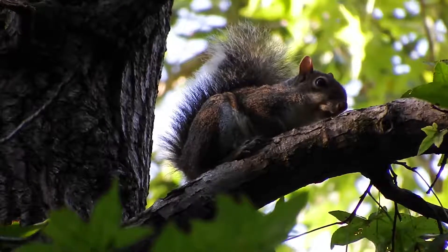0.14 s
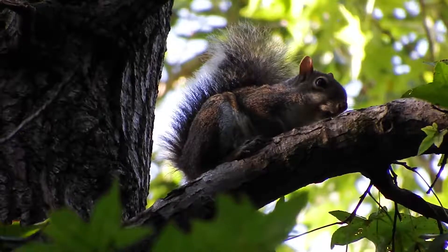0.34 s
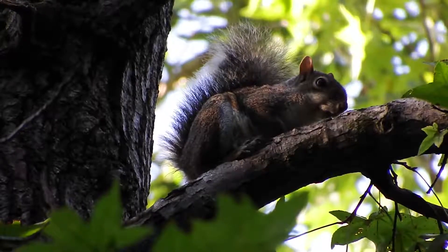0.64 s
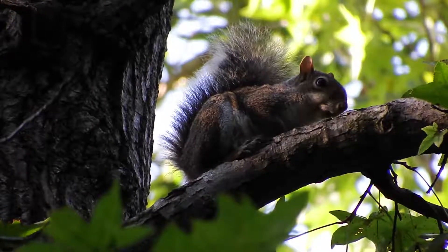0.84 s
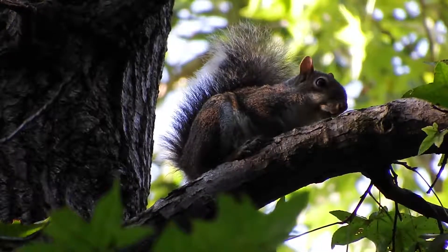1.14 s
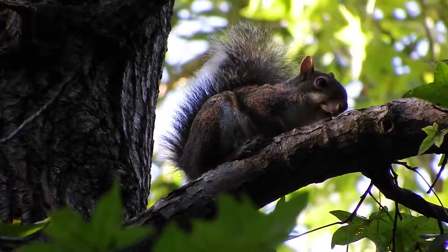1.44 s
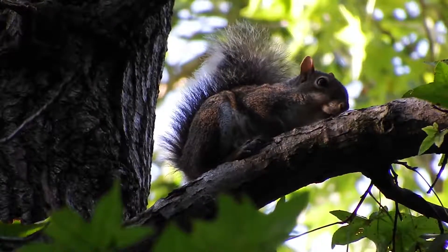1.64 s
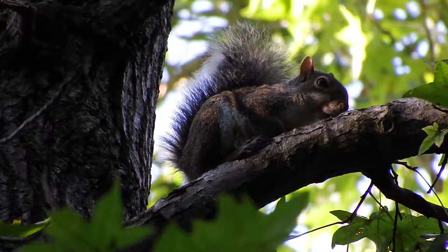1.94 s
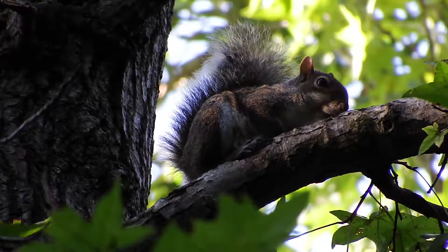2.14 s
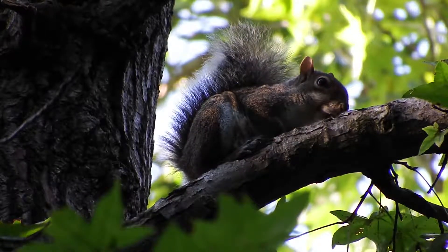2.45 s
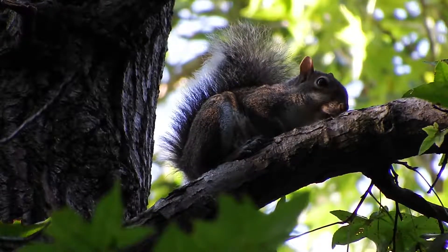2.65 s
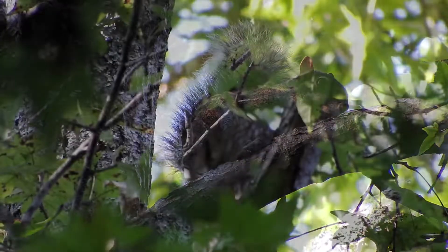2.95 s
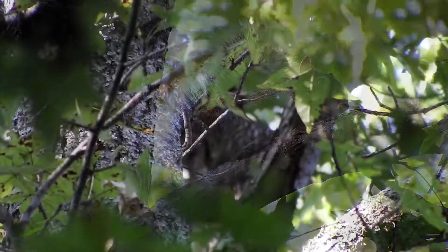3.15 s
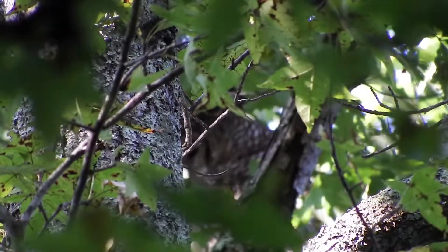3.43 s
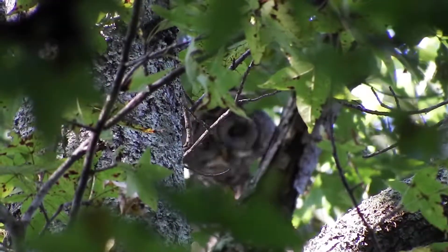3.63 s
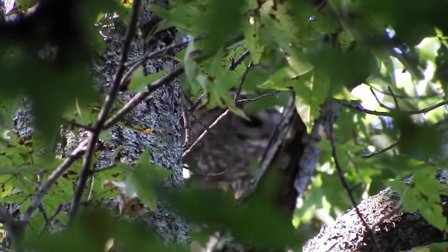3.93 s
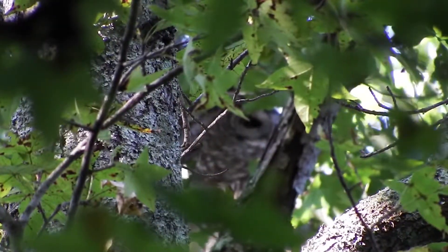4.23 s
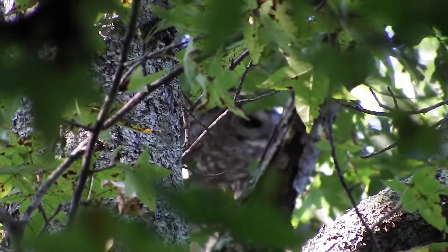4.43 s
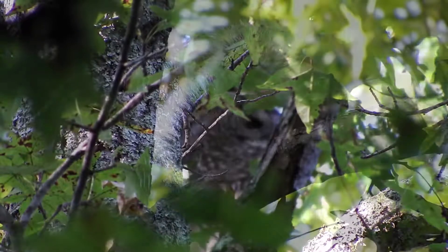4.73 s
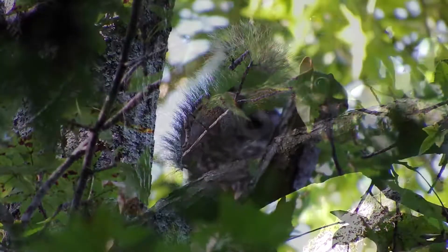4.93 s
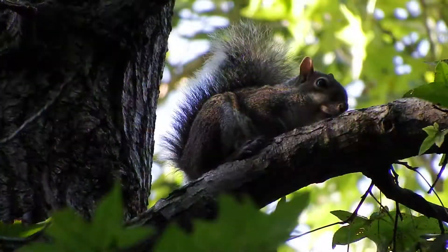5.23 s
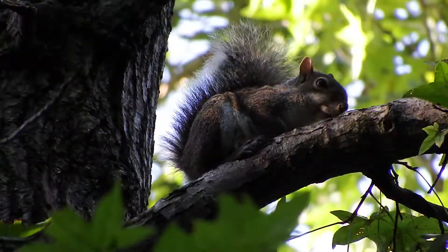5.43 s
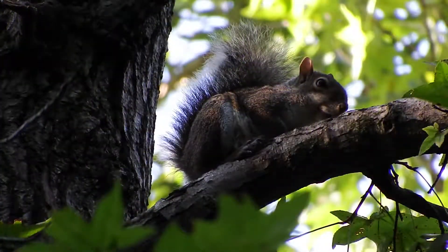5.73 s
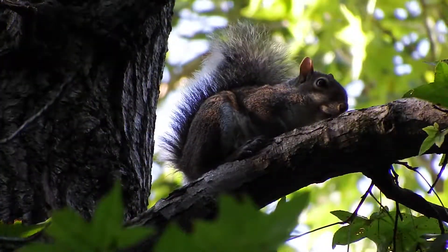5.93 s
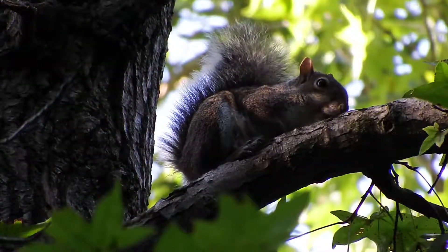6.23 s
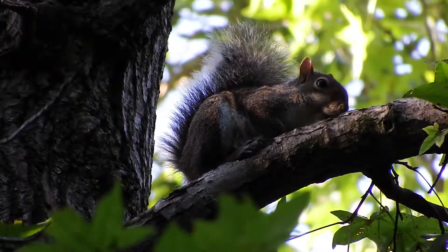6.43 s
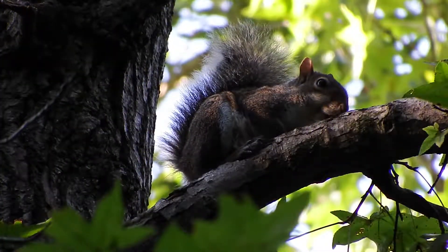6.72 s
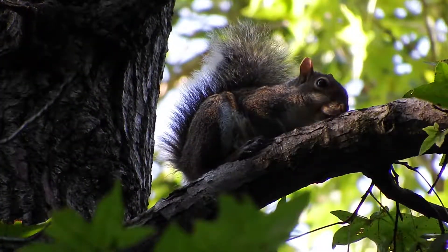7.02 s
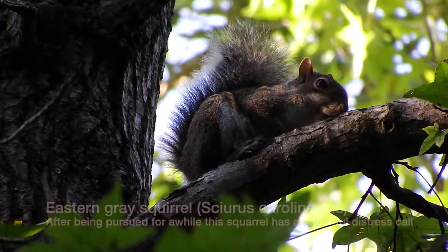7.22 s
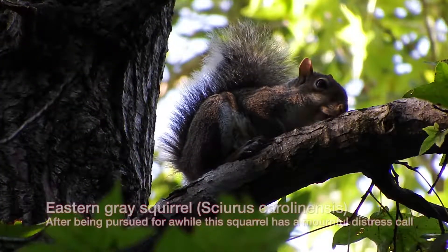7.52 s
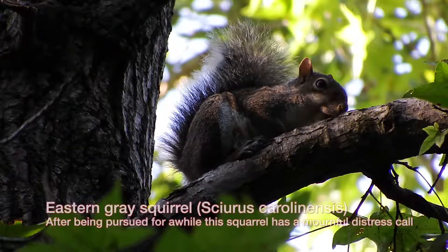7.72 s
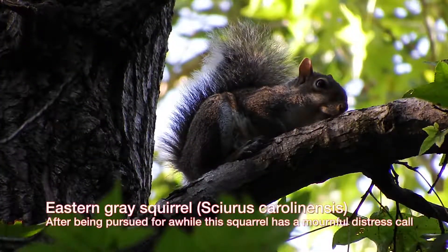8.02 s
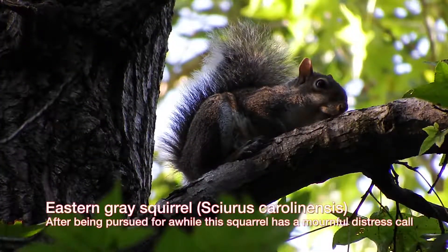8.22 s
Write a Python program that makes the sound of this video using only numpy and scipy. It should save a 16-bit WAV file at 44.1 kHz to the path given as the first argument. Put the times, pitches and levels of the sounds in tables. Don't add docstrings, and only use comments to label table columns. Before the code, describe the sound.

A squirrel on a branch gives two long hoarse rasping cries with a soft clear moan between, as wrens whistle in echoing woodland under steady hiss.

```python
import sys
import numpy as np
from scipy import signal
from scipy.io import wavfile
from scipy.ndimage import uniform_filter1d

SR = 44100
rng = np.random.default_rng(int(sys.argv[2]) if len(sys.argv) > 2 else 0)


def store_pcm(level_fs):
    pcm = np.round(np.clip(level_fs, -1, 1) * 32767).astype(np.int16)
    wavfile.write(sys.argv[1], SR, np.atleast_2d(pcm).T)


def amplitude_ratio(level_db):
    exponent = np.asarray(level_db, float) / 20
    return 10 ** exponent


N = 369024

# pitch_hz, level_db
ROAR_COLOUR = [(40, -52), (90, -19.5), (200, -11), (270, -3.5), (450, -2), (780, 2.5), (1000, -4.5),
               (1400, -4.5), (2000, -10.5), (2500, -11), (3500, -10.5), (4350, -9), (4900, -12),
               (6000, -19.5)]
# time_s, level_db
ROAR_LEVEL = [(0.0, -46.5), (0.3, -49.5), (0.67, -48.5), (1.32, -49.5), (1.56, -50.5), (2.16, -51),
              (2.49, -51.5), (5.01, -50.5), (5.54, -51), (6.45, -50), (7.22, -50.5), (8.36, -49.5)]
# pitch_hz, likeness (0-1)
ROAR_LIKENESS = [(60, 1), (250, 0.88), (1000, 0.95), (2500, 0.92), (5000, 1)]
# pitch_hz, level_db
HISS_COLOUR = [(3240, -30), (5500, 0), (6410, -2.5), (7850, -1), (14600, -6), (15700, -9)]
# centre_hz, width_hz
MIC_NOTCHES = [(215, 52), (1100, 145)]
# centre_hz, width_hz, level_db
CAMERA_BODY = [(361, 75, -14.5), (823, 170, 1), (1080, 130, 1.5), (1390, 230, -2.5), (2217, 77, -9.5),
               (3400, 140, -9.5), (4266, 150, -8.5)]
# time_s, level_db, strong_weak_step_db
LENS_LEVEL = [(0, -44, -0.5), (.4, -45.5, 5), (.8, -44.5, 5.5), (1.05, -49.5, 8), (1.3, -44.5, 3),
              (1.49, -49.5, 8)]
# time_s, level_db
LENS_CLICK = (1.521, -28.5)
# pitch_hz, decay_t60_s
WOOD_DECAY = [(1000, 0.4), (2500, 1), (4000, 0.89), (6000, 0.59)]

# centre_s, length_s, start_hz, end_hz, peak_db
FAR_PHRASE = [
    (-.08, .03, 2963, 3180, -3.5),
    (-.045, 0.022, 2883, 3300, 5.5),
    (-.012, .03, 3100, 3746, 5),
    (.06, 0.12, 3774, 3718, 0),
    (.145, .05, 2150, 2447, -2),
    (.31, 0.2, 2461, 2481, -9),
    (0.198, .16, 3760, 3718, -8),
]
# start_s, level_db, held_note_hz, low_answer_db, lead_in_db
FAR_ROUNDS = [
    (1.3, -40.5, 3825, 1, -4),
    (1.69, -37, 3775, -9, -3.5),
    (2.095, -38, 3716, -5.5, -2),
    (2.5, -39, 3670, -10, -14),
    (7.335, -34, 3795, -9, -16),
    (7.7, -39, 3750, -3, -2),
    (8.105, -38.5, 3680, -27, -4),
]
# centre_s, length_s, start_hz, end_hz, peak_db
STRAY_NOTES = [
    (0.028, .04, 2900, 3560, -43),
    (0.074, .04, 3300, 4100, -45),
    (0.395, .015, 3520, 2780, -46),
    (.45, .05, 3797, 3740, -44.5),
    (0.769, .02, 3300, 2790, -42),
    (0.824, .05, 3710, 3793, -47),
    (1.129, .02, 3300, 2780, -41.5),
    (1.19, .05, 3750, 3800, -44.5),
    (2.86, .15, 3350, 3270, -37),
    (3.0, .16, 3250, 3060, -50),
]
# centre_s, length_s, start_hz, end_hz, peak_db
NEAR_PHRASE = [(-.008, 0.0047, 5040, 4660, -10), (0, .009, 3810, 3497, 1), (.001, 0.013, 4650, 2650, -15),
               (.006, .007, 3140, 2610, -7.5), (0.052, .033, 2300, 2247, -16.5),
               (0.074, .011, 3044, 2590, -12), (.081, 0.013, 2725, 3070, -2.5),
               (0.089, .014, 3035, 3750, -10.5), (.097, .017, 3620, 4180, -7),
               (0.117, 0.013, 4374, 4840, -4.5), (.172, .03, 2280, 2690, -13), (.193, .016, 2696, 2920, -3),
               (0.259, .087, 2325, 1795, -16)]
# start_s, level_db, tempo_stretch, fall_depth under the resting note, upper_lift (0-1)
NEAR_ROUNDS = [
    (4.471, -23, .98, 0.71, .001),
    (4.879, -23.5, .98, .9, 0.001),
    (5.275, -22, .995, 1.0, 0.01),
    (5.671, -22, 1.01, 0.83, .05),
]
# pitch_hz, level_db, decay_t60_s
BEAK_MODES = [(3300, -12, 0.012), (4700, -20, 0.014), (6160, -2, 0.006), (8200, -9, .005)]

# time_s, effort_db, first_resonance_hz, mouth_opening (0-1)
CRIES = [
    [(1.8, -27, 2210, 0.4), (1.84, -42, 2130, 0.96), (1.915, -35.5, 2140, 0.74), (2.02, -39, 2060, 0.64),
     (2.15, -42, 2120, 0), (2.41, -42.5, 2020, 0.34), (2.6, -43.5, 2100, 0.43), (2.76, -43, 2073, 0.89),
     (2.88, -55, 2084, 0.76)],
    [(6.2, -35, 2080, .5), (6.24, -39, 2080, 0.3), (6.28, -36, 2070, 0.73), (6.4, -38.5, 2080, 0.52),
     (6.52, -40, 2130, 0.02), (6.78, -42, 1950, 0.23), (7.1, -45.5, 2080, 0.78), (7.3, -44, 2066, 0.95),
     (7.365, -55, 2040, 0.64)],
]
# centre_hz, width_hz, level_db, fade_s
CRY_BREATH = [(1815, 70, -4, .17), (5050, 600, 1.5, .12), (9100, 900, 2.5, .15)]
# shut_hz, open_hz, shut_db, open_db
UPPER_THROAT = [(2804, 2680, -8, -1.5), (3223, 3400, 2, -4.5), (3730, 3950, -7.5, 9.5)]
# pitch_hz, level_db
CLEAR_THROAT = [(500, -29), (1000, -24), (1550, -18), (2050, -3), (2600, -9.5), (3100, -7), (3600, -4.5),
                (4100, -4.5), (4700, 3.5), (5300, 20)]
# start_s, pitch_hz, level_db, sag_hz
OPENERS = [
    (1.8, 1125, -34, 43.6),
    (6.197, 1050, -33.5, 4.6),
]
# start_s, settle_s, level_db
VOICE_SLIDES = [
    (2.02, .105, -41),
    (6.385, .135, -43),
]
# time_s, pitch_hz, level_db, half_line_share (0-1), brightness_db per octave
MOAN = [
    [(4.755, 1044, -73, .01, -10), (4.83, 1008, -40.5, 0.1, -7.5), (4.875, 996, -38.5, 0.5, -4),
     (4.89, 1015, -39.5, .95, -6), (4.96, 1006, -41.5, 1, -3.5), (5.0, 976, -48, .1, -14),
     (5.09, 944, -34, 0.3, -4)],
    [(5.17, 990, -52, .01, 1), (5.27, 1025, -44, 0.1, 4)],
]

BEAK_SNAP_S = 4.4782


def evened(x):
    return x / np.sqrt(np.mean(x ** 2) + 1e-20)


def read(points, hz):
    f, value = np.transpose(points)
    return np.interp(np.log(hz + 1), np.log(f + 1), value)


def add(mix, s, sound):
    part = mix[round(s * SR):][:len(sound)]
    part += sound[:len(part)]


def unroll(rows):
    s, *columns = np.transpose(rows)
    t = np.arange(s[0], s[-1], 1 / SR)
    return t, [np.interp(t, s, c) for c in columns]


def wander(count, smooth):
    noise = rng.standard_normal(3 * SR // 2 + 2000)
    return evened(uniform_filter1d(noise, round(smooth)))[:count]


def flutter(smooth):
    return evened(uniform_filter1d(rng.standard_normal(N), size=smooth))


def resonate(x, hz, width):
    turn = np.exp(2j * np.pi * np.cumsum(hz * np.ones(len(x))) / SR)
    r = np.exp(-np.pi * width / SR)
    smooth = signal.lfilter([(1 - r) ** 2], [1, -2 * r, r * r], x / turn)
    return 2 * (turn * smooth).real


def snap(hz, db, t60):
    t = np.arange(SR // 20) / SR
    return amplitude_ratio(db - 60 * t / t60) * np.sin(2 * np.pi * hz * t) * np.minimum(t / 0.00035, 1)


def air(spectrum, same, patchy_db):
    frames, hz = N // 1024 + 5, np.fft.rfftfreq(2048, 1 / SR)
    a, b, c, d, patches = rng.standard_normal((frames, len(hz), 5)).T
    patches = uniform_filter1d(patches, size=20, axis=0)
    patches = evened(uniform_filter1d(patches, size=4, axis=1))
    same = np.clip(read(same, hz), -1, 1)[:, None]
    left = a + 1j * b
    right = same * left + np.sqrt(1 - same ** 2) * (c + 1j * d)
    z = np.array([left, right]) * amplitude_ratio(read(spectrum, hz)[:, None] + patchy_db * patches)
    return evened(signal.istft(z, window="cosine", nperseg=2048, noverlap=1024)[1][:, :N])


def distant_roar():
    level_db = np.interp(np.arange(N) / SR, *np.transpose(ROAR_LEVEL))
    return air(ROAR_COLOUR, ROAR_LIKENESS, 0.78) * amplitude_ratio([[3.8], [3.2]] + level_db)


def preamp_hiss():
    colour = [(100, -29), (4000, -4)] + HISS_COLOUR[1:]
    return amplitude_ratio(-69 + 6.0) * air(colour, [(100, .15), (16000, 0.16)], 0.33)


def lens():
    steps_per_s, first_s = 59.94, .0018
    t, (db, step_db) = unroll(LENS_LEVEL)
    count = np.floor((t - first_s) * steps_per_s)
    since = (t - first_s) - count / steps_per_s
    uneven_db = 2.9 * rng.standard_normal(size=100)[count.astype(int) + 1]
    size_db = step_db * (-1) ** (count + 1) + uneven_db
    knocks = amplitude_ratio(size_db) * (np.exp(-since / 0.0044) + 0.15) * wander(len(t), 1)
    body = sum(amplitude_ratio(g) * evened(resonate(knocks, hz, w)) for hz, w, g in CAMERA_BODY)
    click = snap(740, -4, 0.038) + snap(1450, -1.3, 0.028) + snap(1860, -4.5, .02)
    click += snap(3140, -3, 0.014) + snap(4300, 0.45, .02)
    out = np.zeros(N)
    add(out, 0, amplitude_ratio(db) * evened(body))
    add(out, LENS_CLICK[0], amplitude_ratio(LENS_CLICK[1]) * click)
    return out


def wood(x, first_s):
    taps = rng.standard_normal((2, SR)) * (rng.random((2, SR)) < .03)
    taps = taps * (np.arange(SR) > first_s * SR)
    hz, t, z = signal.stft(taps, SR)
    tail = signal.istft(z * amplitude_ratio(-60 * t / read(WOOD_DECAY, hz)[:, None]), SR)[1]
    tail = tail[0] + .1 * np.array([tail[1], -tail[1]])
    return signal.fftconvolve(x[None], tail / np.linalg.norm(tail[0]), axes=1)[:, :N]


def whistle(centre, length, start_hz, end_hz, db):
    u = np.linspace(0, 1, round(length * 1.3 * SR))
    hz = start_hz + (end_hz - start_hz) * (1.3 * u - .15)
    tone = np.sin(2 * np.pi * np.cumsum(hz) / SR)
    return centre - length * .65, amplitude_ratio(db) * tone * signal.windows.tukey(len(u), .8)


def far_birds():
    far = np.zeros(N)
    for s, db, held_hz, low_db, lead_db in FAR_ROUNDS:
        shift = held_hz / 3774
        for centre, length, start_hz, end_hz, note_db in FAR_PHRASE:
            level_db = db + note_db + low_db * (end_hz < 2600) + lead_db * (centre < 0)
            add(far, *whistle(s + centre, length, shift * start_hz, shift * end_hz, level_db))
    for note in STRAY_NOTES:
        add(far, *whistle(*note))
    return far * (0.5 + 0.41 * flutter(400))


def near_notes():
    rest_hz, upper_hz, upper_width_hz = 2300, 3750, 710
    for s, db, tempo, depth, lift in NEAR_ROUNDS:
        for centre, length, start_hz, end_hz, note_db in NEAR_PHRASE:
            at, hz = s + tempo * centre, np.array([start_hz, end_hz])
            raised = 1 + lift * np.exp(-((hz - upper_hz) / upper_width_hz) ** 2)
            hz = hz * np.minimum(hz / rest_hz, 1) ** (depth - 1) * raised
            warm_db = -12.5 * hz.mean() / rest_hz * np.exp(-(at - NEAR_ROUNDS[0][0]) / 0.2)
            if at > BEAK_SNAP_S + .02:
                yield at, tempo * length, *hz, db + note_db + warm_db


def near_wren():
    near = np.zeros(N)
    for note in near_notes():
        add(near, *whistle(*note))
    add(near, .079, amplitude_ratio(-9.5) * near.copy())
    return near


def beak_snap():
    beak = np.zeros(N)
    add(beak, BEAK_SNAP_S, sum(snap(*mode) for mode in BEAK_MODES))
    return signal.lfilter(*signal.butter(2, 2900, "high", fs=SR), beak)


def throat(rows):
    t, (db, hz, mouth) = unroll(rows)
    mouth = np.clip(mouth, 0, 1)
    to_yelp = rows[-2][0] - t
    catch_db = -10 * np.exp(-(to_yelp / .09) ** 2) * (to_yelp > 0) + 6 * (to_yelp <= 0)
    lag_db = -19 * np.exp(-((t - t[0]) / 0.059) ** 2) - catch_db
    columns = [db + catch_db, hz + 170 * (to_yelp <= 0)]
    for shut_hz, open_hz, shut_db, open_db in UPPER_THROAT:
        columns.append(shut_db + (open_db - shut_db) * mouth + lag_db)
        columns.append(shut_hz + (open_hz - shut_hz) * mouth)
    columns[2] = columns[2] + 9.5 * ((t - t[0]) / (t[-1] - t[0]) - .5)
    return t, columns


def cry(rows):
    t, (db, hz1, db2, hz2, db3, hz3, db4, hz4) = throat(rows)
    n = len(t)
    pitch = hz1 / 4 * (1 + .12 * wander(n, 300))
    slaps = np.diff(np.floor(np.cumsum(pitch) / SR), prepend=0) * (1 + 0.51 * wander(n, 1))
    lurch = amplitude_ratio(1.24 * wander(n, 350))
    drive = lurch * (0.46 * evened(slaps) + 0.72 * wander(n, 1))
    # centre, level, body gain and width_hz, core gain and width_hz
    resonances = [(hz1, 1, 1.05, 295, 0.35, 57), (hz2, amplitude_ratio(db2), 0.85, 240, 0.34, 64),
                  (hz3, amplitude_ratio(db3), 1, 610, .5, 67), (hz4, amplitude_ratio(db4), -1, 210, .5, 65)]
    voice = np.zeros(n)
    for hz, level, body, body_hz, core, core_hz in resonances:
        voice += level * body * evened(resonate(drive, hz, body_hz))
        voice += level * core * evened(resonate(drive, hz, core_hz))
    voice += amplitude_ratio(db4 - 5) * evened(resonate(drive, 1.137 * hz4, 940))
    age = np.maximum(t - t[0] - .04, 0)
    for hz, width, start_db, fade_s in CRY_BREATH:
        fade = np.minimum(age / 0.01, 1) * np.exp(-(age / fade_s) ** 4)
        voice += amplitude_ratio(start_db) * evened(resonate(drive, hz, width)) * fade
    return t[0], amplitude_ratio(db - 2.5) * voice * signal.windows.tukey(n, .05)


def opener(start, hz, db, sag_hz):
    u = np.linspace(0, 1, num=9)
    tilt_db = np.interp(u, [0, 1], (-15, 5.5))
    return np.transpose([start + 0.053 * u, hz - sag_hz * np.sqrt(u), db - 7.5 * u, u, tilt_db, 4680 + 0 * u])


def voice_slide(start, settle, db):
    lasts, from_hz, to_hz = 2.0, 1050, 790
    u = np.linspace(0, 1, num=9)
    hz = to_hz + (from_hz - to_hz) * np.exp(-lasts * u)
    tilt_db = np.interp(u, [0, 1], (18, -6))
    return np.transpose([start + lasts * settle * u, hz, db - u, .95 + 0 * u, tilt_db, 3.65 * hz])


def clear_voice(rows):
    t, (hz, db, half, tilt_db, ceiling_hz) = unroll(rows)
    turns = np.cumsum(hz * (1 + 0.0047 * wander(len(t), 300))) / SR
    voice = np.zeros(len(t))
    for k in range(1, 11):
        line_hz = k * hz / 2
        colour_db = read(CLEAR_THROAT, line_hz) + tilt_db * np.log2(k * hz / 4100)
        colour_db -= 90 * np.log2(np.maximum(line_hz / ceiling_hz, 1))
        voice += amplitude_ratio(colour_db) * (half if k % 2 else 1) * np.cos(np.pi * k * turns)
    level = amplitude_ratio(db + 1.6 * wander(len(t), 405)) * np.sqrt(2)
    return t[0], level * voice * signal.windows.tukey(len(t), .25)


def squirrel_voice():
    squirrel = np.zeros(N)
    for rows in CRIES:
        add(squirrel, *cry(rows))
    for start, settle, _ in VOICE_SLIDES:
        squirrel *= amplitude_ratio(-5 * np.exp(-((np.arange(N) / SR - start) / settle - 1) ** 4))
    clear = [opener(*row) for row in OPENERS]
    clear += [voice_slide(*row) for row in VOICE_SLIDES]
    clear += [[(*row, 4280) for row in rows] for rows in MOAN]
    for rows in clear:
        add(squirrel, *clear_voice(rows))
    return squirrel


def scene():
    mix = distant_roar() + lens()
    far = far_birds()
    mix += amplitude_ratio(-4) * far + amplitude_ratio(2.0) * wood(far, 0.0063)
    near = near_wren()
    smeared = near * (0.96 + .5 * flutter(30))
    mix += near * amplitude_ratio([[1.2], [-1.2]]) + amplitude_ratio(-2.5) * wood(smeared, 0.011)
    beak = beak_snap()
    mix += beak + amplitude_ratio(-13.0) * wood(beak, 0.0055)
    squirrel = squirrel_voice()
    return mix + squirrel * amplitude_ratio([[.15], [-.15]]) + amplitude_ratio(-6.5) * wood(squirrel, .01)


def roll_off(x):
    return signal.sosfilt(signal.butter(12, 15780, fs=SR, output="sos"), x)


def record(dry):
    dry = signal.lfilter(*signal.butter(2, 75, "high", fs=SR), dry)
    dry = signal.sosfilt(signal.cheby2(6, 32, 1.2 * 4562, fs=SR, output="sos"), dry)
    for hz, width in MIC_NOTCHES:
        dry = signal.lfilter(*signal.iirnotch(hz, hz / width, SR), dry)
    return roll_off(dry + preamp_hiss())


dry = scene()
out = record(dry)
store_pcm(out)
```